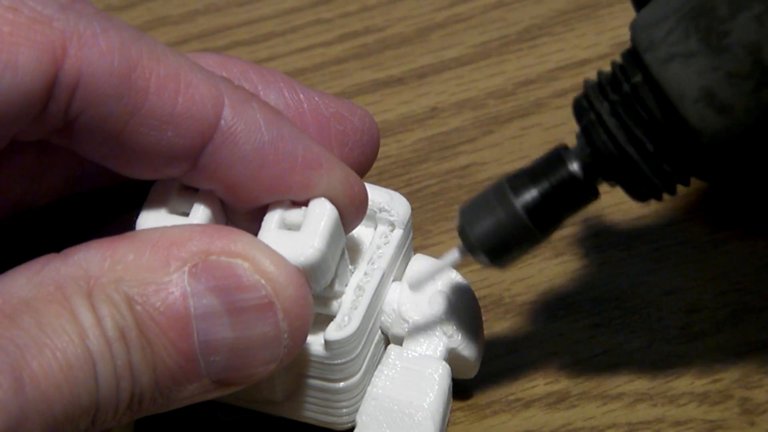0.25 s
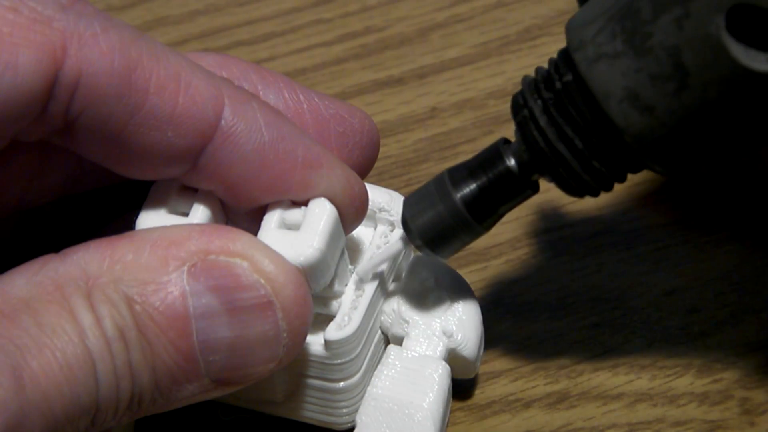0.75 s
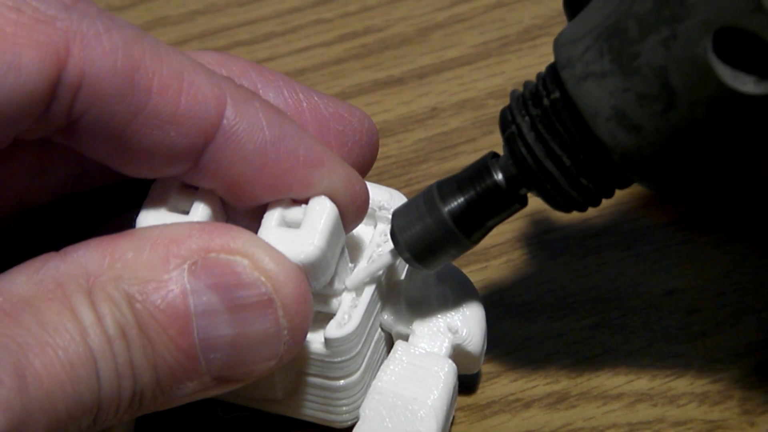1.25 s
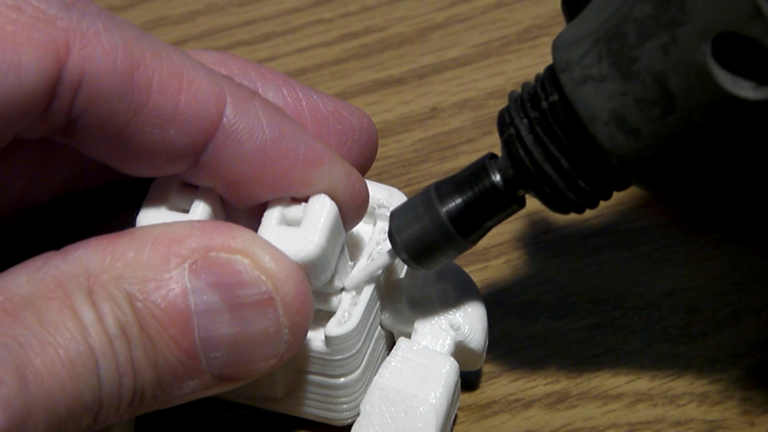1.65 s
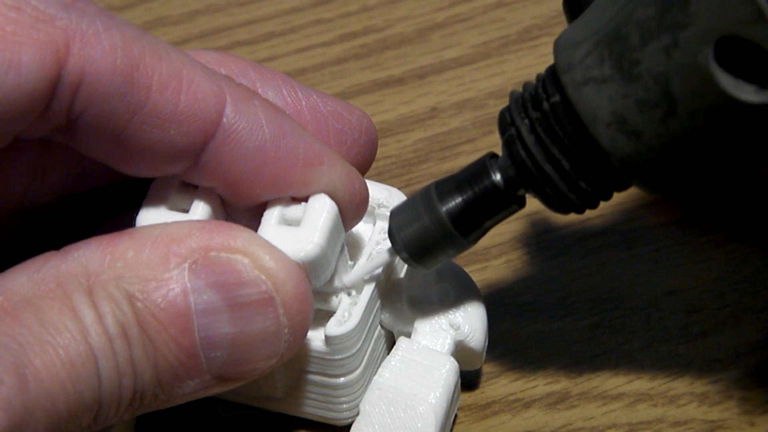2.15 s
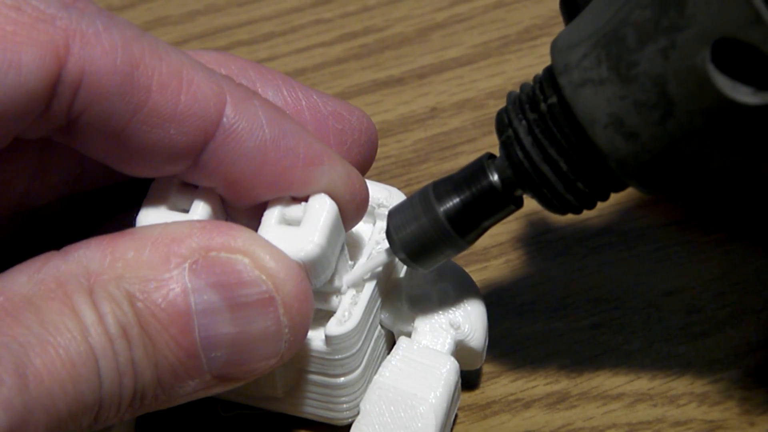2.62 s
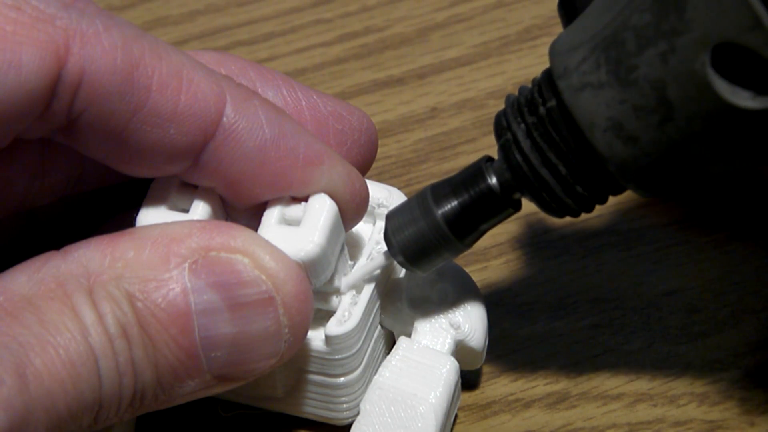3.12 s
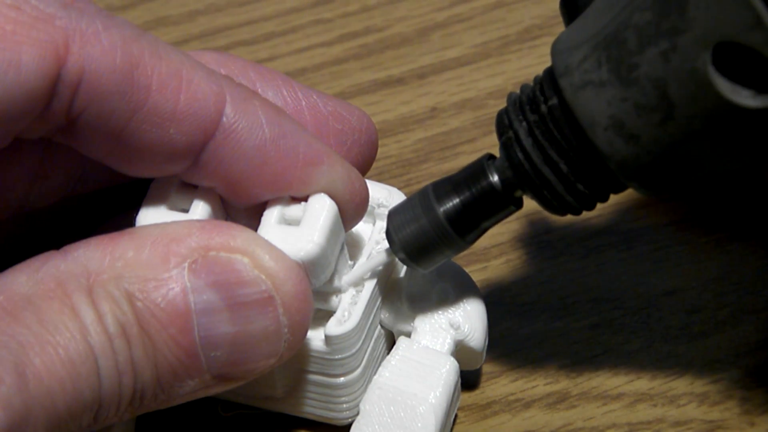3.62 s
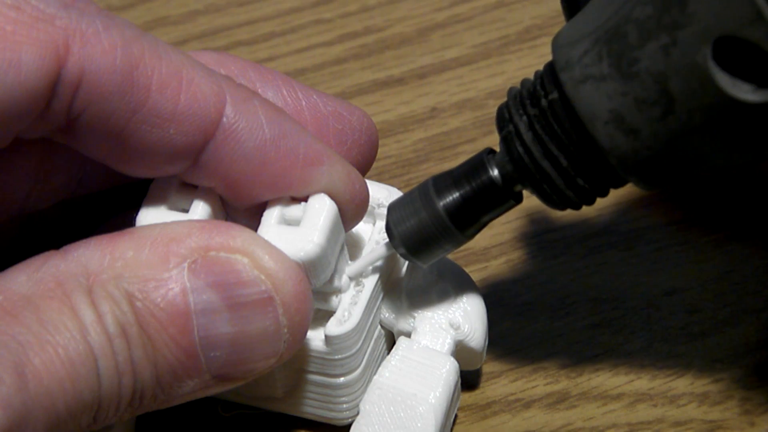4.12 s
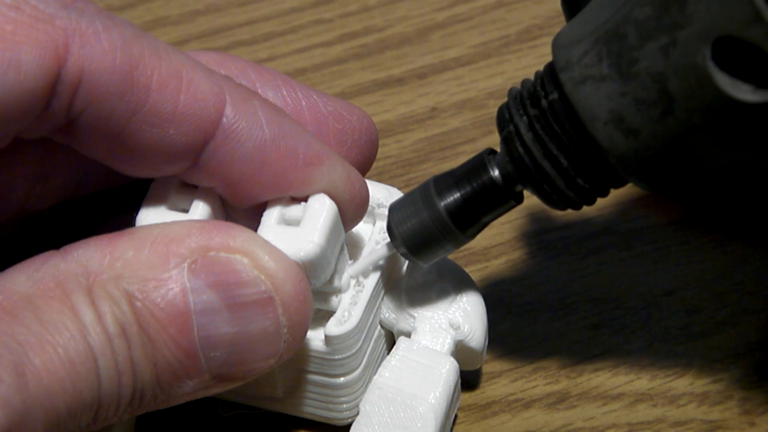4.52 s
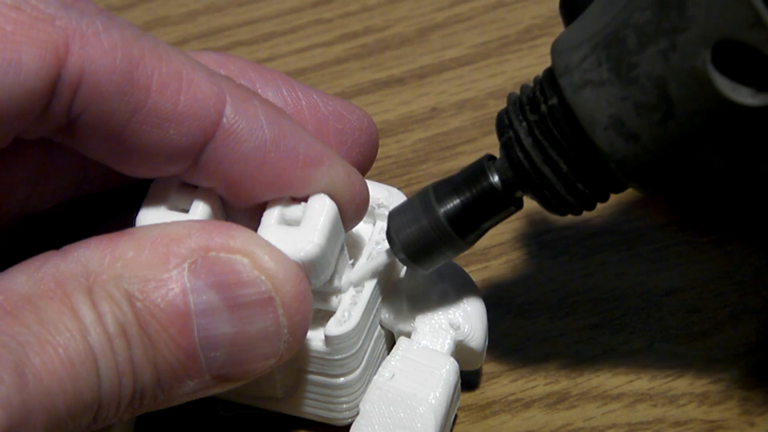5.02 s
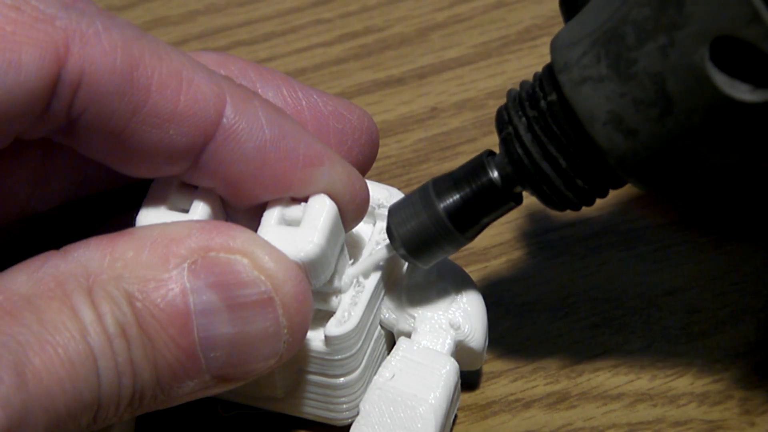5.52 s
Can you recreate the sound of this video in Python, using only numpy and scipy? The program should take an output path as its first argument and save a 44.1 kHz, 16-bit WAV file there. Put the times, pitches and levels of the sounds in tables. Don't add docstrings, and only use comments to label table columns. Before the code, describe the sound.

A handheld rotary tool is already running at full speed, close and dry, the same in both channels. Its shrill whine stacks many tones: a buzzy electrical tone around 2.4 kHz, a strong fan tone near 5.5 kHz and bearing tones reaching above 13 kHz, over broad bright air hiss and only a faint low hum. Loudness climbs steadily through the first second, with a soft hollow knock at 0.2 s. From about 1.07 to 1.45 s a spinning plastic rod bites the part in a rapid, uneven, scratchy chatter, bright and brittle; the tool's level ducks abruptly at the strikes and recovers. The pitch then slides down by about half a semitone until 3 s, the high tones singing harder near 2.5 s. Afterwards the loaded whine stays nearly constant, drifting barely lower with small flutter. A slight dip in level comes at 5.4 s, recovering gradually; the motor never stops.

```python
import sys
import numpy as np
from scipy import signal
from scipy.fft import rfft, irfft, next_fast_len
from scipy.io import wavfile
from scipy.ndimage import uniform_filter1d

SR = 44100
rng = np.random.default_rng(int(sys.argv[2]) if len(sys.argv) > 2 else 0)


def bounce(signal):
    frames = np.transpose(np.atleast_2d(signal))
    limited = np.clip(frames, -1, 1)
    pcm = np.round(limited * 32767).astype(np.int16)
    wavfile.write(sys.argv[1], SR, pcm)


def voltage_ratio(decibels):
    exponent = np.asarray(decibels, float) / 20
    return 10 ** exponent


N = 254456
T = np.arange(N) / SR

# [t/s, shaft speed f/Hz, fan blade level/dB, armature slot level/dB]
TOOL_RUN = [(0.0, 308.04, -30, -37), (0.3, 307.89, -26, -47), (0.5, 307.85, -28, -31),
            (0.95, 307.59, -25.5, -30), (1.4, 306.95, -26, -28), (1.8, 304.82, -27, -28),
            (2.2, 303.09, -27.5, -27.5), (2.45, 300.95, -22.5, -30), (2.75, 299.0, -25.5, -27.5),
            (3.0, 298.18, -25, -27.5), (3.2, 298.24, -25, -27.5), (3.42, 297.48, -26.5, -27),
            (3.6, 297.32, -26.5, -27.5), (3.9, 296.62, -24.5, -29.5), (4.4, 296.09, -23, -29.5),
            (4.6, 296.5, -25.5, -28.5), (4.85, 296.13, -23.5, -33), (5.77, 295.08, -23.3, -34)]
# [order, free level/dB, loaded level/dB]
SHAFT_HARMONICS = [(6, -43.5, -45), (7, -44, -45.5), (10, -44, -43), (11, -42, -37.5), (12, -47, -41),
                   (14, -37.5, -37), (15, -38.5, -42), (16, -42, -45), (17, -42.5, -43.5), (20, -45, -42),
                   (22, -42, -42), (24, -40, -47), (31, -40.5, -40), (33, -42.5, -40.5), (34, -44, -39),
                   (35, -39.5, -45.5), (36, -31.5, -32), (37, -39.5, -40), (38, -37, -36.5),
                   (40, -41.5, -44), (41, -38.5, -37), (42, -43, -40), (43, -45, -38), (44, -36, -38.5),
                   (45, -43, -40.5), (46, -39, -38), (47, -41.5, -41.5), (48, -42, -37), (49, -42, -40)]
FAINT_ORDERS = [13, 19, 21, 23, 25, 27, 28, 29, 30, 32, 39, 50, 51]
# [order, free level/dB, loaded level/dB]
BEARING_TONES = [(10.83, -53, -49.5), (20.17, -49, -45), (21.65, -47.5, -47.5), (22.73, -48.5, -50),
                 (23.81, -40.5, -42.5), (27.84, -39, -47), (29.69, -33, -33.5), (30.31, -47.5, -42),
                 (31.69, -37, -38.5), (34.64, -37, -42.5), (35.36, -49, -41), (35.52, -36.5, -36),
                 (35.72, -44, -41), (41.27, -47, -46), (42.22, -42, -46), (42.47, -50, -45),
                 (43.19, -34.5, -33), (44.19, -42.5, -45.5), (45.11, -45, -44), (45.66, -48.5, -45),
                 (46.94, -45, -45), (48.86, -52.5, -45.5)]
STAGE_SPEEDS_HZ = [303.5, 298.5]
# [free level/dB, biting level/dB, loaded level/dB]
SLOT_SIDE_TONES = [
    (-31.5, -31.5, -31),
    (-38.5, -42.5, -31),
    (-42.5, -41, -37.5),
]
BITE_SPEEDS_HZ = [
    307.6,
    307.2,
    300.6,
    299.3,
]
# [t/s, length t/s, low ring level/dB, high ring level/dB]
CHATTER_BURSTS = [(1.067, .032, -25, -25), (1.1, .045, -26.5, -38), (1.13, .03, -30, -23),
                  (1.15, .028, -26, -25), (1.168, .03, -36, -28), (1.195, .07, -29.5, -32),
                  (1.235, .03, -31, -27), (1.255, .08, -30, -33), (1.302, .03, -32, -25),
                  (1.325, .04, -28, -36), (1.35, .035, -28, -36), (1.405, .03, -26, -24.5)]
# [f/Hz, width f/Hz]
ROD_RINGS = [
    (6900, 700),
    (9900, 1300),
    (13600, 2500),
]
# [t/s, length t/s, f/Hz, width f/Hz, level/dB]
BENCH_BUMPS = [
    (.195, .075, 1260, 90, -33),
    (1.68, .05, 210, 90, -50),
    (1.3, .4, 612, 12, -49),
]
# [f/Hz, level/dB per Hz]
AIR_SPECTRUM = [(40, -82.5), (150, -80.5), (400, -76.5), (600, -76.5), (900, -67.5), (1650, -68.5),
                (3000, -67.5), (5000, -65), (7000, -65), (9000, -60.5), (10500, -55), (13200, -59),
                (14300, -56), (15900, -72.5)]
# [f/Hz, width f/Hz, level/dB]
HOUSING_CAVITIES = [(621, 125, 9), (1010, 71, 7), (1256, 136, 12.5), (1452, 61, 6.5), (2980, 620, 1.5),
                    (4340, 610, 0), (2600, 280, -6), (3600, 310, -3), (5750, 190, -5), (7000, 160, -1),
                    (9000, 260, -1.5)]
# [t/s, depth level/dB, recovery t/s]
GAIN_DUCKS = [
    (1.067, 6.5, 0.083),
    (1.136, 3.5, 0.083),
    (1.165, 1.5, 0.11),
    (1.315, 2.5, 0.16),
    (1.408, 1.2, 0.048),
    (5.42, 2, 0.34),
]
# [f/Hz, half width f/Hz, level/dB]
PORT_DIPS = [
    (7875, 340, -25),
    (11800, 200, -20),
]

FREE_HZ, LOADED_HZ = 305, 298
MAINS_HZ, FIRST_PULSE_S = 120.02, 0.0056
BLADES, SLOTS = 18, 8
DUCK_FALL_S = 0.0085


def evened(x):
    return x / np.sqrt(np.mean(abs(x) ** 2) + 1e-20)


def curves(rows):
    t_s, *columns = np.transpose(rows)
    return [np.interp(T, t_s, column) for column in columns]


def drift(per_s, t=T):
    knots = rng.standard_normal(600)
    return np.sqrt(1.5) * np.interp(t * per_s, np.arange(len(knots)), knots)


def resonate(x, hz, width_hz):
    carrier = np.exp(2j * np.pi * hz * T)
    r = np.exp(-np.pi * width_hz / SR)
    return 2 * (carrier * signal.lfilter([1 - r], [1, -r], x / carrier)).real


def hump(start_s, length_s):
    return np.sin(np.pi * np.sqrt(np.clip((T - start_s) / length_s, 0, 1)))


def tones(turns, speed_hz, table, wander_db, flutter):
    strain_hz, strain_width_hz, strain_from_order = 299.5, 2.8, 28
    strain_db, relief_db = 3, -1.2
    t, speed = T[::64], speed_hz[::64]
    out = np.zeros(N)
    for order, *stage_db in table:
        db = np.interp(-speed, np.negative(STAGE_SPEEDS_HZ), stage_db)
        if order > strain_from_order:
            strain = np.exp(-((speed - strain_hz) / strain_width_hz) ** 2)
            db = db + relief_db + strain_db * strain
        level = voltage_ratio(db + wander_db * drift(3.23, t)) * (1 + flutter * drift(30, t))
        shift = 2 * np.pi * rng.random() + flutter * drift(40, t)
        out += np.interp(T, t, level) * np.cos(2 * np.pi * order * turns + np.interp(T, t, shift))
    return np.sqrt(2) * out


def shaft(turns, speed_hz):
    faint = [(order, -47.5, -47.5) for order in FAINT_ORDERS]
    out = tones(turns, speed_hz, SHAFT_HARMONICS, wander_db=1.1, flutter=0.12)
    out += tones(turns, speed_hz, faint, wander_db=3, flutter=0.12)
    ripple = 1 + 0.12 * np.cos(2 * np.pi * MAINS_HZ * T)
    return voltage_ratio(1.2) * out * ripple


def bearings(turns, speed_hz):
    return voltage_ratio(1.6) * tones(turns, speed_hz, BEARING_TONES, wander_db=0.76, flutter=0.14)


def blades(turns, speed_hz, blade_db):
    return voltage_ratio(blade_db) * tones(turns, speed_hz, [(BLADES, 0, 0)], wander_db=-1.2, flutter=0.075)


def slots(turns, speed_hz, centre_db, load):
    chirp_rad, fall_db, sag_db, second_db = 0.45, -6, -3, -41
    lower, upper, far = (np.interp(-speed_hz, np.negative(BITE_SPEEDS_HZ), [free, biting, biting, loaded])
                         for free, biting, loaded in SLOT_SIDE_TONES)
    lowest = lower + fall_db + sag_db * load
    levels_db = [lowest - 11 + 2 * sag_db * load, lowest, lower, centre_db, upper, far, far - 9]
    mains = 2 * np.pi * MAINS_HZ * (T - FIRST_PULSE_S)
    slot = 2 * np.pi * SLOTS * turns
    buzz = sum(voltage_ratio(db) * np.cos(slot + k * mains + chirp_rad * abs(k))
               for k, db in zip(range(-3, 4), levels_db))
    octave = np.cos(2 * slot - mains)
    octave += 0.47 * np.cos(2 * slot - 2 * mains)
    octave += 0.31 * np.cos(2 * slot + mains)
    octave *= voltage_ratio(second_db - 6.8 * (1 - load))
    wobble = voltage_ratio(-58.5) * np.cos(2 * np.pi * turns + mains)
    return np.sqrt(2) * (buzz + octave + wobble) * (1 + 0.037 * drift(30))


def hum(turns, speed_hz):
    hum_db, near_db, approach_s = -49.5, 4.5, 0.95
    level = voltage_ratio(hum_db + near_db * np.exp(-T / approach_s))
    return level * tones(turns, speed_hz, [(1, 0, 0)], wander_db=1.0, flutter=0.12)


def chatter(turns):
    rough, uneven_db, slip_turns = 0.5, 1.6, 0.008
    slipping = turns + slip_turns * drift(70)
    knocks = evened(sum(np.cos(2 * np.pi * k * slipping) for k in range(18, 51)))
    scrape = (1 + np.cos(2 * np.pi * slipping)) ** 2 * rng.standard_normal(N)
    drive = knocks * voltage_ratio(uneven_db * drift(100)) + rough * evened(scrape)
    low, high, top = (evened(resonate(resonate(drive, hz, width), hz, width)) for hz, width in ROD_RINGS)
    swells = np.array([hump(s - 0.003, 1.3 * length) ** 2 for s, length, *_ in CHATTER_BURSTS])
    low_level, high_level = voltage_ratio(np.array(CHATTER_BURSTS)[:, 2:]).T @ swells
    return low_level * low + high_level * (high + voltage_ratio(-2.0) * top)


def bumps():
    noise = rng.standard_normal(N)
    out = np.zeros(N)
    for s, length, hz, width, db in BENCH_BUMPS:
        ring = resonate(resonate(noise, hz, width), hz, width)
        out += voltage_ratio(db) * hump(s, length) * evened(ring)
    return out


def air(duck_db):
    air_db, patchy_db, swell_db = -20.5, 0.35, 0.46
    vent_db, vent_wander_db = -2.5, 0.5
    vent_bite = 0.44
    treble_db = vent_db + vent_wander_db * drift(4.98) + vent_bite * duck_db
    frames, hz = N // 256 + 5, np.fft.rfftfreq(1024, 1 / SR)
    a, b, patches = rng.standard_normal((frames, 513, 3)).T
    patches = uniform_filter1d(patches, size=10, axis=0)
    patches = evened(uniform_filter1d(patches, size=12, axis=1))
    f, db = np.transpose(AIR_SPECTRUM)
    colour_db = np.interp(np.log(hz + 1), np.log(f), db)
    colour_db += sum(d / (1 + (2 * (hz - c) / w) ** 2) for c, w, d in HOUSING_CAVITIES)
    frame_treble_db = np.interp(np.arange(frames) * 256 / SR, T, treble_db)
    vents_db = np.clip((hz - 6000) / 3000, 0, 1)[:, None] * frame_treble_db
    z = (a + 1j * b) * voltage_ratio(colour_db[:, None] + vents_db + patchy_db * patches)
    rush = signal.istft(z, nperseg=1024, noverlap=768)[1][:N]
    return voltage_ratio(air_db + swell_db * drift(20)) * evened(rush)


def ducking():
    out_db = np.zeros(N)
    for s, depth_db, back_s in GAIN_DUCKS:
        since = np.maximum(T - s, 0)
        recovery = np.exp(-np.maximum(since - DUCK_FALL_S, 0) / back_s)
        out_db += depth_db * np.minimum(since / DUCK_FALL_S, 1) * recovery
    return out_db


def recorder_gain(duck_db):
    start_db, creep_db_per_s, settled_db, bite_s = -7.5, 7, -0.32, 1.066
    creep_db = start_db + creep_db_per_s * T
    return voltage_ratio(np.where(T < bite_s + DUCK_FALL_S, creep_db, settled_db) - duck_db)


def scene():
    speed_hz, blade_db, slot_db = curves(TOOL_RUN)
    turns = np.cumsum(speed_hz + 0.13 * drift(25)) / SR
    load = np.clip((FREE_HZ - speed_hz) / (FREE_HZ - LOADED_HZ), 0, 1)
    duck_db = ducking()
    tool = shaft(turns, speed_hz) + bearings(turns, speed_hz)
    tool += blades(turns, speed_hz, blade_db)
    tool += slots(turns, speed_hz, slot_db, load)
    tool += hum(turns, speed_hz)
    tool += air(duck_db)
    mono = recorder_gain(duck_db) * tool + chatter(turns) + bumps()
    return np.array([mono, mono])


def top_cut(x):
    return signal.sosfilt(signal.butter(12, 15670, fs=SR, output="sos"), x)


def record(dry):
    edge_hz = 15700
    size = next_fast_len(N)
    hz = np.fft.rfftfreq(size, 1 / SR)
    port = voltage_ratio(sum(db * np.exp(-abs((hz - c) / w) ** 1.5) for c, w, db in PORT_DIPS))
    mix = irfft(rfft(dry, size) * port * (hz < edge_hz), size)[:, :N]
    return top_cut(mix)


dry = scene()
out = record(dry)
bounce(out)
```